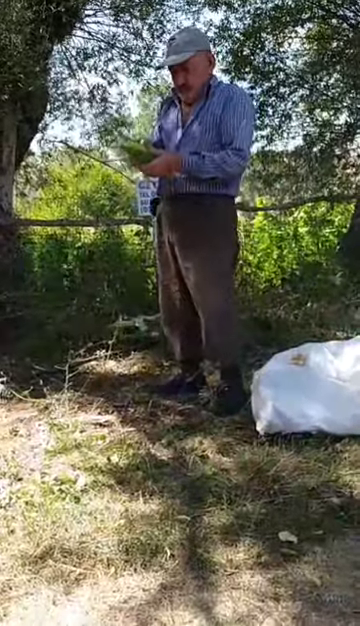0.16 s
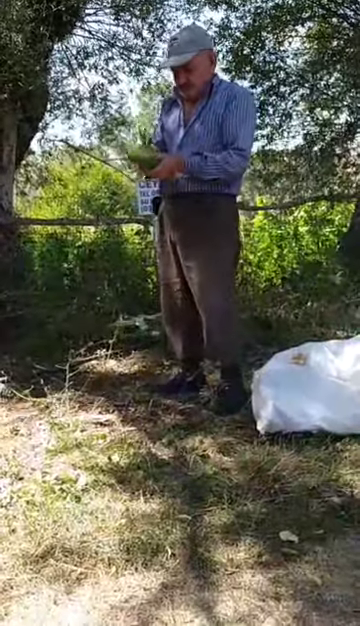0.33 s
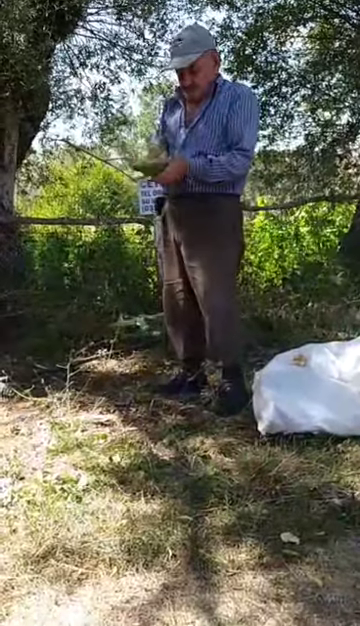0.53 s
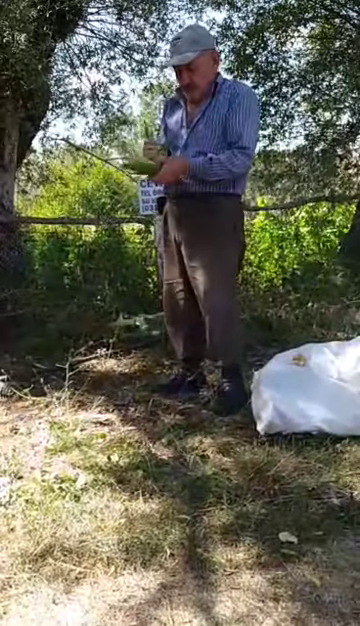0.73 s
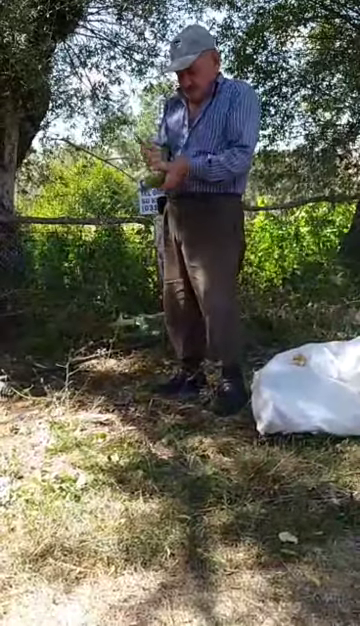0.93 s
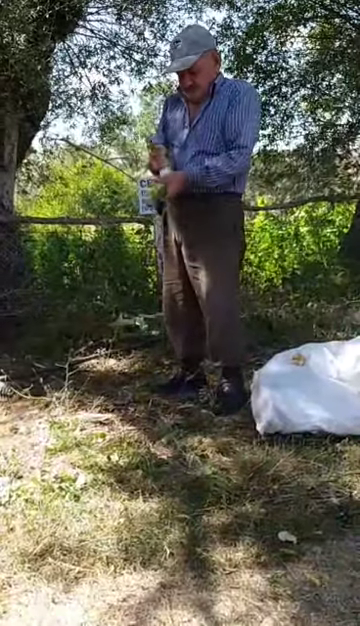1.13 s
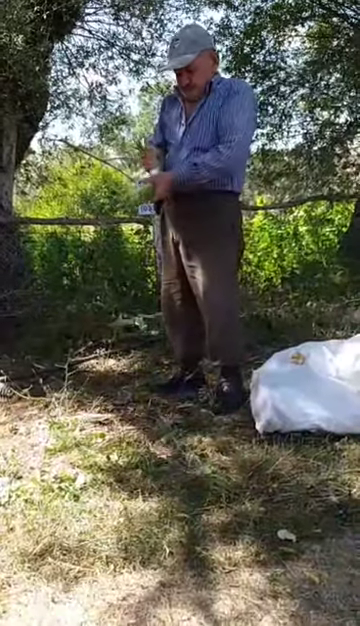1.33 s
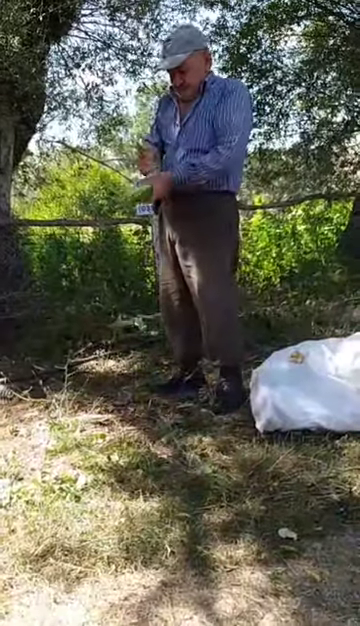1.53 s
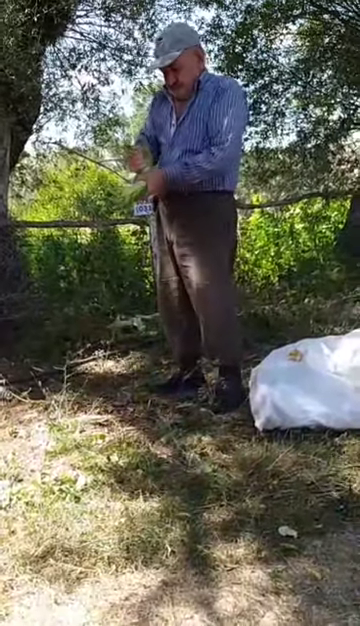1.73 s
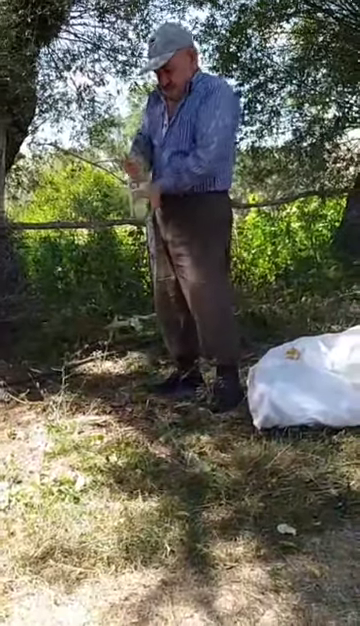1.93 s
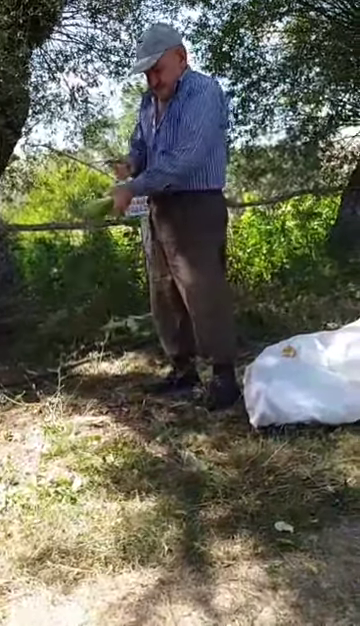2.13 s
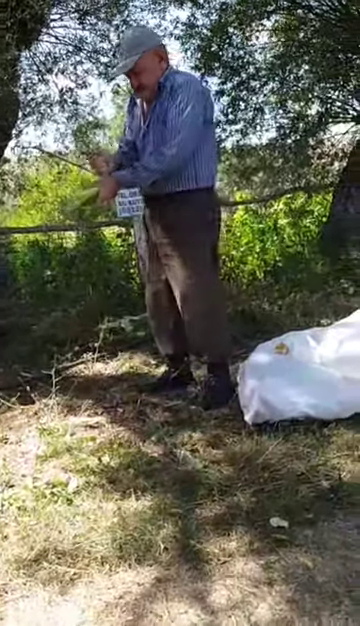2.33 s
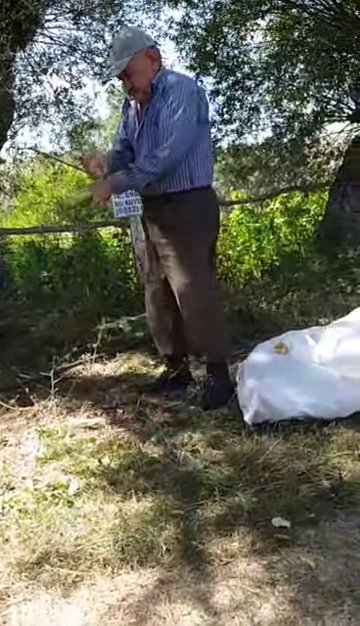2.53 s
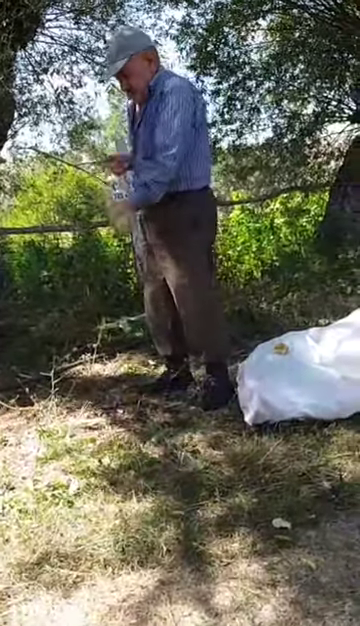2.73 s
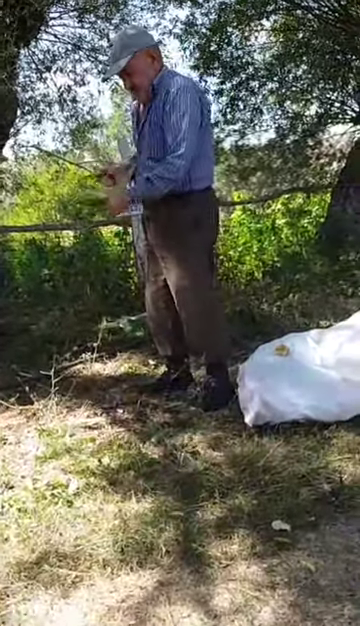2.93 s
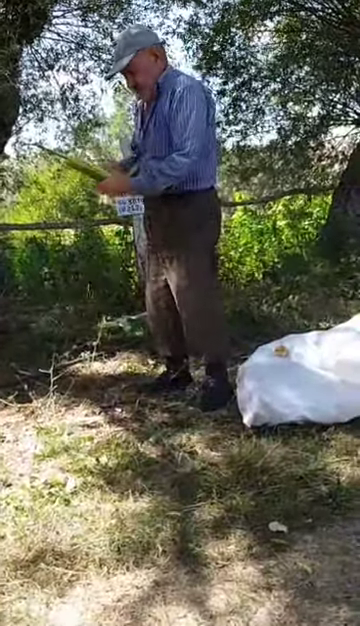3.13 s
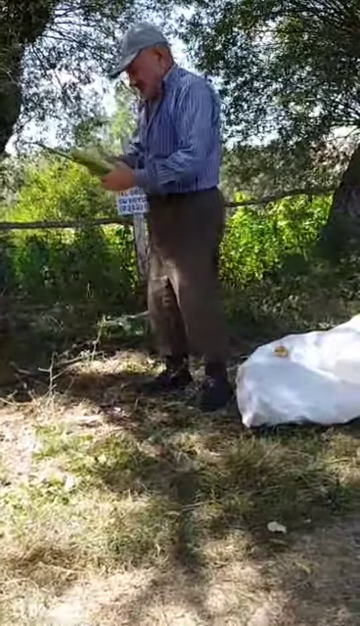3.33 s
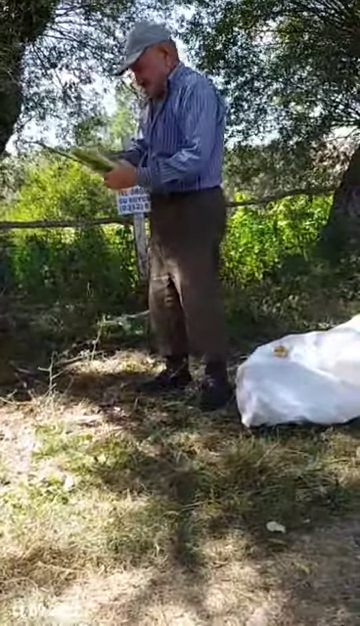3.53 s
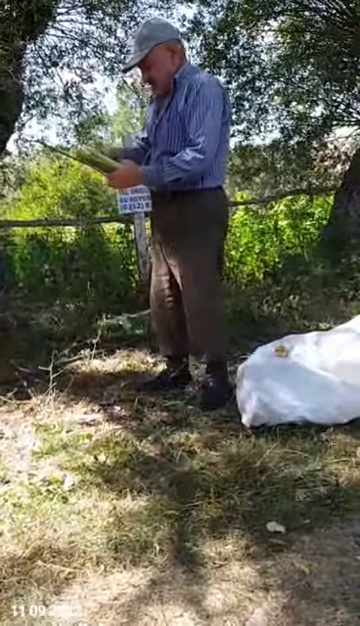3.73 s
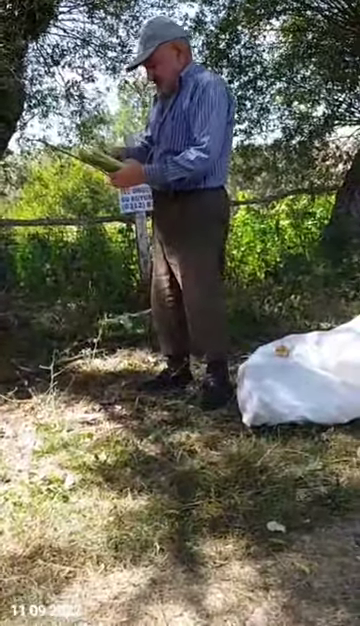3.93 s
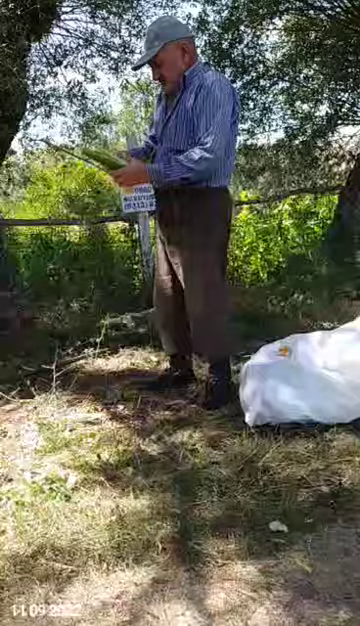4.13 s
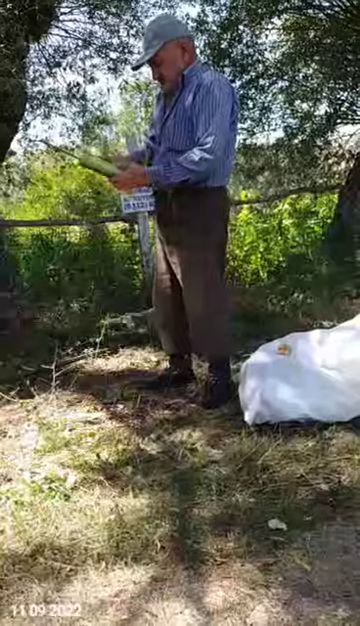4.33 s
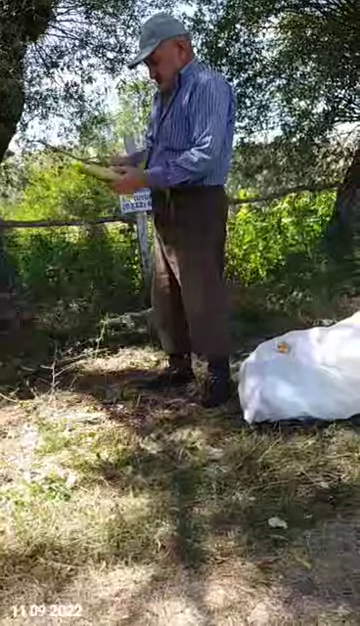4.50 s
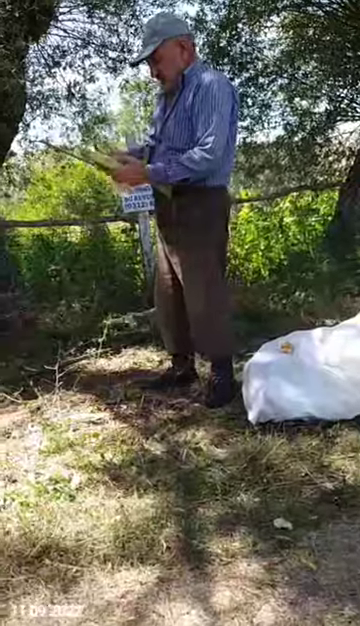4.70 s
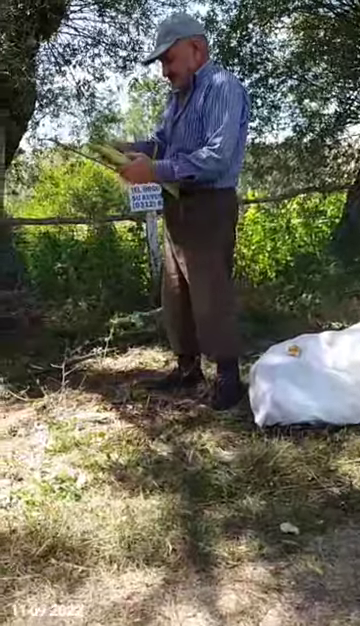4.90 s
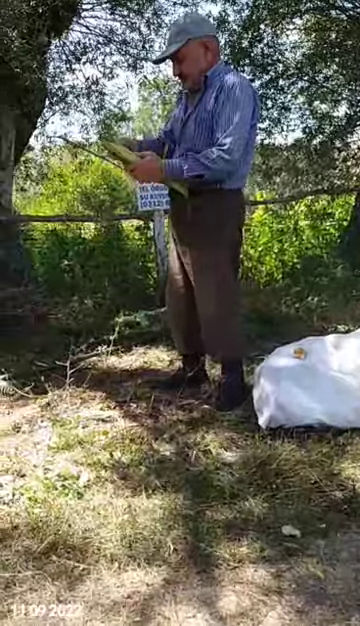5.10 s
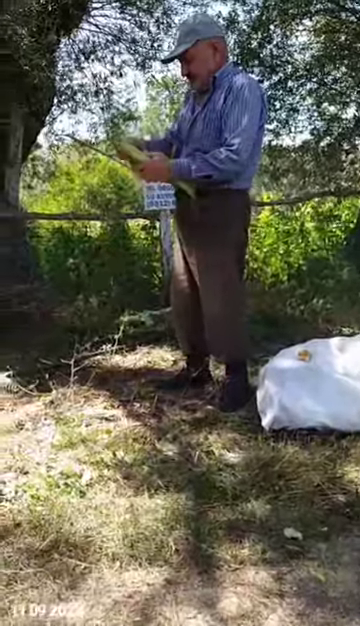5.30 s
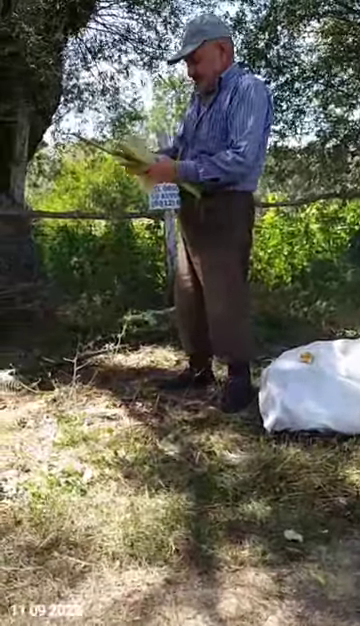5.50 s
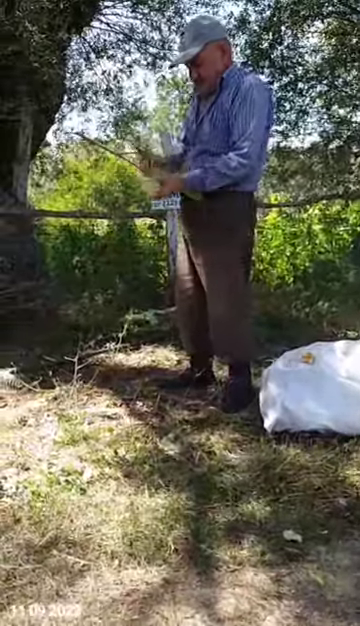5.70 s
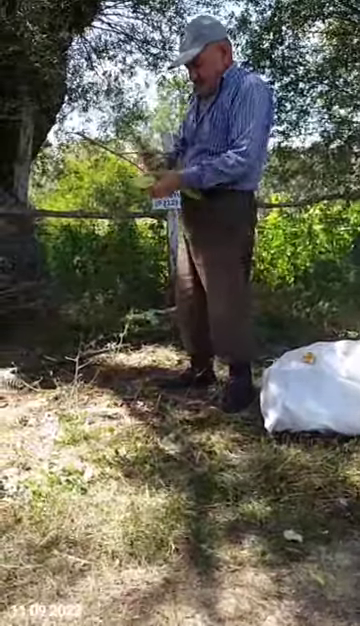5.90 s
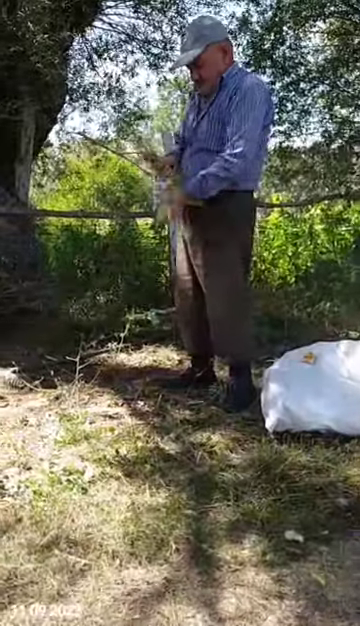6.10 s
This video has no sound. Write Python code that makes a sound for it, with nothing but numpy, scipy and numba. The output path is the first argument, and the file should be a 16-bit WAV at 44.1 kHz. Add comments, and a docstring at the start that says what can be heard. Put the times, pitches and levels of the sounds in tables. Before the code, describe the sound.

Fresh corn husk is torn by hand outdoors, with crackling rips, sharp snaps, a brief flapping rip and squeak over a faint breeze.

```python
"""Husking corn under trees

A fresh ear of corn is husked under trees, about three metres from a phone with two microphone ports.
Each pull parts fibres as random grains of noise; snapping ribs are clicks that ring the leaf's modes.
A moist leaf creaks and squeaks by uneven slips, and one husk is ripped right off and flaps.
Hands knock dully as damped, sagging tones; the trees return a faint tail.
Behind, filtered noise makes a murmuring breeze, a hiss of foliage and puffs at the ports."""
import sys
import numpy as np
from scipy import signal
from scipy.fft import rfft, irfft
from scipy.io import wavfile
from scipy.ndimage import uniform_filter1d
from numba import njit

SR = 44100
rng = np.random.default_rng(int(sys.argv[2]) if len(sys.argv) > 2 else 0)


def dump(signal):
    """Clip the signal to [-1, 1] and save it as 16-bit WAV at the path in sys.argv[1]."""
    limited = np.clip(np.atleast_2d(signal).T, -1, 1)
    pcm = np.round(limited * 32767).astype(np.int16)
    wavfile.write(sys.argv[1], SR, pcm)


N = 271215
TIME = np.arange(N) / SR

# All table levels are relative: mix gains and the microphone's colour come after them.
# strips of husk torn down the ear: [start t/s, length/s, fibre crackle level/dB, papery rub level/dB]
TEARS = [(0.488, 0.1, -50.5, -58), (0.585, 0.091, -56, -61), (1.095, 0.17, -47.5, -58.5),
         (2.044, 0.0044, -33.5, -38), (2.735, 0.044, -32.5, -36.5), (5.599, 0.021, -47, -48.5),
         (5.656, 0.056, -46.5, -57), (5.721, 0.026, -54, -49)]
# hands and loose leaves slide over the ear: [middle t/s, half length/s, crackle level/dB, rub level/dB]
SLIDES = [(0.163, 0.84, -63.5, -73), (0.345, 0.035, -54.5, -61.5), (0.592, 0.063, -55, -58),
          (0.83, 0.038, -57.5, -67.5), (0.942, 0.042, -57.5, -67), (1.074, 0.018, -60, -59),
          (1.194, 0.014, -44.5, -52), (1.24, 0.21, -54, -62.5), (1.556, 0.077, -51, -64.5),
          (1.812, 0.06, -59, -79), (2.046, 0.033, -45.5, -53), (2.349, 0.06, -58.5, -66),
          (2.723, 0.021, -56, -60), (2.844, 0.17, -77, -65.5), (3.046, 0.037, -55.5, -72),
          (4.22, 0.39, -63, -66.5), (4.466, 0.077, -50.5, -59.5), (4.987, 0.98, -67.5, -70),
          (5.65, 0.14, -49, -57), (5.692, 0.013, -39, -60), (5.917, 0.061, -59.5, -67),
          (6.045, 0.053, -55, -68.5), (6.128, 0.084, -61, -62.5)]
# leaf ribs that snap: [t/s, click level/dB, jolt to the leaf level/dB, dry treble crack level/dB]
SNAPS = [(0.2442, -48, -59, -70), (0.2727, -45, -64, -70), (0.4828, -41.5, -59, -70),
         (0.506, -43, -53, -68), (0.5346, -45, -60, -68), (0.5837, -40, -46, -68), (0.6503, -53, -46, -70),
         (0.6777, -47, -66, -70), (1.0954, -34, -48, -60), (1.1078, -37, -50, -66), (1.122, -37, -46, -60),
         (1.1452, -39, -51, -62), (1.1503, -34, -50, -62), (1.183, -35, -45, -60),
         (1.1928, -40, -35.5, -60), (1.2166, -39, -54, -64), (1.2418, -20.5, -52, -33),
         (1.6283, -45, -61, -70), (1.7925, -27, -62, -57), (1.8047, -46, -66, -70), (1.8098, -43, -56, -70),
         (2.0325, -34, -49, -62), (2.0404, -22, -31, -60), (2.0435, -25, -26.5, -60),
         (2.0496, -26, -36, -62), (2.0597, -32, -57, -64), (2.3684, -41, -59, -70), (2.7162, -45, -60, -70),
         (2.7354, -27, -44, -60), (2.7374, -24, -42, -58), (2.7418, -21.5, -43, -55),
         (2.7479, -35, -20, -58), (2.7654, -29, -33, -58), (2.769, -35, -26, -58), (2.781, -19.5, -51, -56),
         (2.787, -29, -46, -62), (4.4134, -36, -62, -70), (4.5919, -40, -68, -67), (5.4843, -43, -56, -70),
         (5.5042, -37, -50, -58), (5.5873, -30, -50, -53), (5.5896, -28, -52, -58), (5.6027, -36, -60, -60),
         (5.6146, -28.5, -48, -58), (5.6197, -29, -37, -60), (5.6698, -31, -54, -56),
         (5.688, -28, -52, -60), (5.7438, -35.5, -50, -62), (5.7658, -48, -62, -66),
         (5.7713, -33.5, -50, -46), (5.781, -43, -64, -62), (5.9762, -40, -66, -70)]
# whole husk flexes in the hand or flaps as it is ripped off: [start t/s, length/s, level/dB, release/s]
FLEXES = [(1.253, 0.066, -63.5, 0.13), (2.754, 0.036, -41, 0.035), (2.815, 0.019, -46, 0.06),
          (4.13, 0.11, -63.5, 0.23)]
# moist leaf sticks and slips on the one beneath, a slow creak then a squeak:
# two lists of [t/s, slip rate f/Hz, level/dB, ring of the leaf f/Hz]
SQUEAKS = [
    [(1.09, 160, -68, 2110), (1.097, 160, -53.5, 2100), (1.13, 123, -54, 1990), (1.17, 150, -57, 2250),
     (1.208, 207, -59, 1480), (1.25, 200, -72, 1500)],
    [(5.63, 390, -81, 1480), (5.658, 400, -42.5, 1390), (5.675, 350, -47.5, 1220),
     (5.692, 420, -43.5, 1590), (5.707, 440, -46.5, 1500), (5.724, 690, -52.5, 1400),
     (5.775, 650, -73, 1420)],
]
# dull knocks of handling: [t/s, level/dB, first pitch f/Hz, last pitch f/Hz, t60/s, contact tick level/dB]
KNOCKS = [(0.676, -46, 387, 365, 0.1, -60), (2.238, -35.5, 424, 398, 0.033, -55),
          (3.946, -39, 269, 132, 0.09, -47)]
# bending modes of a husk leaf: [f/Hz, width/Hz, level/dB]
LEAF_MODES = [(764, 58, 0), (1540, 174, 1), (2050, 180, 3), (2580, 300, 7.5)]
# hollow between husk and hand: [f/Hz, width/Hz, level/dB]
HOLLOW_MODES = [(166, 48, 6), (260, 80, 7), (340, 19, 8.5), (385.5, 19, 9.5), (791, 46, 1.5),
                (1547, 37, -0.5), (1724, 50, -7), (2000, 27, -10), (1950, 560, -26)]
# modes of the knocked ear: [f/Hz, width/Hz, level/dB]
EAR_MODES = [(452, 35, 3), (735, 230, -4.5), (1090, 210, -4), (1390, 44, -6), (1700, 91, -7)]
# spectral outline of parting fibres: [f/Hz, level/dB]
FIBRE_COLOUR = [(600, -40), (2000, 0), (3000, -22.5), (4700, -1), (6500, 6.5), (9000, 9), (11000, 7),
                (12500, -1), (15500, -6.5)]
# spectral outline of leaf faces rubbing: [f/Hz, level/dB]
PAPER_COLOUR = [(200, -13), (500, -14), (800, 5), (1100, -2), (1600, 1), (2400, 3.5), (3500, 1), (6000, -2),
                (12000, -58)]
# spectral outline of a snapping rib: [f/Hz, level/dB]
RIB_COLOUR = [(400, -13), (1500, 2), (3000, 10), (4500, 13), (6500, 5.5), (8500, 8.5), (11000, 8),
              (13000, -30), (15500, -28)]
# spectral outline of the dry treble crack: [f/Hz, level/dB]
CRACK_COLOUR = [(1200, -18), (2800, 9), (5000, 11), (8500, -8), (13300, 11), (15500, 8)]
# low murmur of the breeze, before and after the big rip: [t/s, level/dB, centre f/Hz]
MURMUR_EARLY = [
    (0.0, -57, 206), (0.07, -63.5, 192), (1.1, -74.5, 225), (1.45, -53.5, 213), (1.72, -61, 187),
    (2.04, -58.5, 176), (2.51, -67, 247), (2.54, -62, 245), (2.68, -57.5, 232)]
MURMUR_LATE = [
    (3.0, -60, 221), (3.35, -64, 230), (3.39, -56, 210), (3.67, -65.5, 218), (4.58, -63, 216),
    (4.89, -77, 222), (5.46, -58, 205), (5.93, -65, 268), (6.15, -64, 197)]
# puffs of air on the ports: [middle t/s, half length/s, level/dB]
PUFFS = [(0.25, 0.034, -58), (0.413, 0.062, -51.5), (0.55, 0.06, -59), (0.854, 0.11, -53),
         (1.343, 0.057, -59)]
# spectral outline of the stirred foliage: [f/Hz, level/dB]
FOLIAGE_COLOUR = [(100, 13.5), (380, 6.5), (550, 6.5), (1000, 4), (2000, -1.5), (4000, -0.5), (7000, -2.5),
                  (9500, -1.5), (11000, -10.5), (12500, -9.5), (15500, -16.5)]
# spectral outline of air buffeting a port: [f/Hz, level/dB]
BUFFET_COLOUR = [(15, 0), (35, -5), (60, -5), (100, -20), (200, -19), (600, -46)]
# resonances of the left, then the right microphone port: [f/Hz, width/Hz, added resonance level/dB]
PORTS = [
    [(327, 120, -6), (9250, 890, -10), (10770, 1630, 3)],
    [(9150, 2220, 6.5)],
]

LEFT_LAG = 6  # samples by which the left port hears the hands later than the right
TOP_HZ = 15700  # upper limit of the microphone
# a tear starts and stops fast, more gently by a share of its length; freed fibres go on settling
TEAR_ATTACK_S, TEAR_RELEASE_S, TEAR_EASE = 0.0042, 0.0014, 0.0085
SETTLE_S, SETTLE_DB = 0.023, -10
# a tear advances in jerks: mean rate, spread of the log rate, decay as a share of a cycle
JERKS_PER_S, JERK_SPREAD, JERK_SHARE = 150, .25, .25
# a bending leaf's pitch wanders: spread as a share of the pitch, new bends per second
BEND_SHARE, BENDS_PER_S = .035, 22
# a snapped rib rings: middle pitch, decay, spread as a share of the pitch
RIB_HZ, RIB_RING_S, RIB_SPREAD = 8900, .00024, .04
# the chest behind the hands returns each snap
CHEST_ECHO_S, CHEST_ECHO_DB = 0.001312, -7
FLEX_ATTACK_S = 0.0081
# shift of the tabled murmur, and a steady murmur under it
MURMUR_SHIFT_DB, MURMUR_STEADY_DB = -1, -67.5
# the draught between the puffs dies down to a calm
DRAUGHT_DB, CALM_DB, DRAUGHT_ENDS_S = -57, -64.5, 2.3


def tearing():
    """Fibres part in a bright crackle while leaf faces rub in jerks and set the leaf ringing."""
    crackle_db, rub_db = handwork()
    # a gentle slide is a fine, even fizz; a hard pull breaks fewer, coarser fibres and jerks more
    effort = np.clip((crackle_db + 56) / 12, 0, 1)
    breaks_per_s = 3400 - 1000 * effort
    spread_db = 3.4 + .5 * effort
    fibres = grains(breaks_per_s, spread_db)
    slipping = jerks(depth=.55 + .35 * effort)
    flutter_db = 1.7 * walk(45)

    crackle_energy = fibres * (1 + slipping) / 2 * undb(crackle_db + flutter_db / 2) ** 2
    crackle = bursts(crackle_energy, FIBRE_COLOUR, ring_s=.0002, scatter_db=-3)

    # the rub catches on every parting fibre and on the leaf's own ridges
    ridges = grains(breaks_per_s / 2, spread_db)
    catches = slipping * (fibres + ridges) / 2 * undb(rub_db + flutter_db) ** 2
    rub = bursts(catches, PAPER_COLOUR, ring_s=.0003, scatter_db=-6)
    ring = ahead(leaf(noise() * np.sqrt(catches)))
    return undb(-7) * crackle + undb(-3) * rub + undb(3) * ring


def handwork():
    """Levels in dB of crackle and rub, from the summed energy of all tears and slides."""
    energy = np.zeros((2, N))
    for start, length, *db in TEARS:
        ease = TEAR_EASE * length
        tear = held(start, length, TEAR_ATTACK_S + ease, TEAR_RELEASE_S + ease)
        settling = undb(SETTLE_DB) ** 2 * fade(tear, SETTLE_S)
        energy += np.outer(undb(db) ** 2, tear + settling)
    for middle, half_length, *db in SLIDES:
        energy += np.outer(undb(db) ** 2, swell(middle, half_length))
    return 10 * np.log10(energy)


def jerks(depth):
    """Energy of a grip that sticks and slips, some slips stronger than others; mean near 1."""
    rate = JERKS_PER_S * np.exp(JERK_SPREAD * walk(JERKS_PER_S))
    cycles = np.cumsum(rate) / SR
    strength = rng.uniform(.3, 1.7, N)[cycles.astype(int)]
    pulse = np.exp(-(cycles % 1) / JERK_SHARE) * strength
    return 1 - depth + depth * pulse / pulse.mean()


def leaf(x):
    """Ring the modes of a leaf, which wander in pitch together as it bends."""
    bend = np.exp(BEND_SHARE * walk(BENDS_PER_S))
    return sum(undb(db) * bandpass(x, hz * bend, float(width)) for hz, width, db in LEAF_MODES)


def snaps():
    """A stiff rib gives way in a sharp click, rings at its own pitch, jolts the leaf and cracks on top."""
    breaks, rings, jolts, cracks = np.zeros((4, N))
    age = TIME[:SR // 200]
    for (s, db, jolt_db, crack_db), chance in zip(SNAPS, rng.standard_normal(len(SNAPS))):
        i = int(s * SR)
        hz = RIB_HZ * np.exp(RIB_SPREAD * chance)
        ring = age * np.exp(-age / RIB_RING_S) * np.sin(2 * np.pi * hz * age)
        rings[i:i + len(age)] += undb(db) * ring / np.linalg.norm(ring)
        breaks[i], jolts[i], cracks[i] = undb(db), undb(jolt_db), undb(crack_db)

    direct = colour(breaks, RIB_COLOUR) + undb(-0.5) * rings + undb(18) * leaf(jolts)
    chest_echo = undb(CHEST_ECHO_DB) * np.roll(direct, int(CHEST_ECHO_S * SR))
    splinters = bursts(breaks ** 2, RIB_COLOUR, ring_s=.0009, scatter_db=-9)
    crack = bursts(cracks ** 2, CRACK_COLOUR, ring_s=.0005, scatter_db=-9)
    return ahead(direct + chest_echo) + undb(-1.5) * splinters + undb(15) * crack


def flap():
    """The loose husk buckles in uneven jerks that drum the hollow between leaf and hand."""
    energy = sum(undb(db) ** 2 * held(start, length, FLEX_ATTACK_S, release)
                 for start, length, db, release in FLEXES)
    buckles = grains(rate=700, spread_db=3) * jerks(depth=.8)
    buckling = noise() * np.sqrt(fade(buckles, .0006))
    band = signal.butter(4, [112, 2600], "bandpass", fs=SR, output="sos")
    body = signal.sosfilt(band, resonate(buckling, HOLLOW_MODES))
    return ahead(even(body) * np.sqrt(energy))


def squeak(table):
    """Uneven stick-slip pulses ring two bending modes of the leaf, which glide together in pitch."""
    rate, level_db, ring_hz = curves(table)
    cycles = np.floor(np.cumsum(rate * np.exp(0.1 * walk(300))) / SR)
    slips = np.diff(cycles, prepend=0) * undb(3.9 * walk(400))
    width_hz = 270.0
    lower = bandpass(bandpass(slips, ring_hz, width_hz), ring_hz, width_hz)
    # the upper mode is broadened by two slightly detuned passes
    upper = bandpass(bandpass(slips, 1.63 * ring_hz, 2 * width_hz), 1.73 * ring_hz, 2 * width_hz)
    touching = (TIME > table[0][0]) & (TIME < table[-1][0])
    damped = signal.sosfilt(signal.butter(4, 2900, fs=SR, output="sos"), lower + undb(-4) * upper)
    return ahead(even(damped) * undb(level_db) * touching)


def knocks():
    """Soft blows: a papery tick rings the ear's modes over a damped tone that sags as the grip gives."""
    thuds, contact = np.zeros(N), np.zeros(N)
    sag_s, attack_s = 0.014, .0016
    for s, db, first_hz, last_hz, t60, tick_db in KNOCKS:
        age = np.maximum(TIME - s, 0)
        cycles = last_hz * age + (first_hz - last_hz) * sag_s * (1 - np.exp(-age / sag_s))
        envelope = (1 - np.exp(-age / attack_s)) * np.exp(-np.log(1000) * age / t60)
        thuds += undb(db - 2.5) * np.sin(2 * np.pi * cycles) * envelope
        contact[int(s * SR)] += undb(tick_db) ** 2
    ticks = bursts(contact, PAPER_COLOUR, ring_s=.003, scatter_db=-14)
    dull_ticks = signal.sosfilt(signal.butter(2, 2000, fs=SR, output="sos"), ticks)
    ring = resonate(np.sqrt(contact), EAR_MODES)
    return ahead(thuds + undb(30.5) * ring) + undb(15) * dull_ticks


def bursts(energy, points, ring_s, scatter_db):
    """Each break is a brief burst of noise, followed by its scatter from hands, body and ground."""
    direct = colour(noise() * np.sqrt(fade(energy, ring_s)), points)
    return ahead(direct) + undb(scatter_db) * scatter(energy, points)


def scatter(energy, points):
    """The diffuse few milliseconds after each break, different at the two ports."""
    return np.array([colour(noise() * np.sqrt(fade(energy, .003)), points) for _ in range(2)])


def ahead(x):
    """A direct sound reaches the right port a little before the left."""
    return np.array([np.roll(x, LEFT_LAG), x])


def trees(x, t60, wet_db, top_hz):
    """Trunks and branches return a faint, duller tail of decaying noise."""
    age = TIME[:SR // 2]
    envelope = np.exp(-np.log(1000) * age / t60) * (1 - np.exp(-age / 0.0016))
    tail = rng.standard_normal((2, len(age))) * envelope
    tail /= np.linalg.norm(tail, axis=1, keepdims=True)
    tail = signal.lfilter(*signal.butter(1, top_hz, fs=SR), tail)
    return undb(wet_db) * signal.fftconvolve(x, tail, axes=1)[:, :N]


def breeze():
    """A wandering low murmur, a smooth hiss of foliage, and turbulent air partly shared by the ports."""
    level_db, centre_hz = curves([*MURMUR_EARLY, *MURMUR_LATE])
    width_hz = 102.0
    strength = np.hypot(undb(level_db + MURMUR_SHIFT_DB), undb(MURMUR_STEADY_DB))
    band = bandpass(bandpass(noise(), centre_hz, width_hz), centre_hz, width_hz)
    murmur = unit(band) * strength * undb(0.24 * walk(25))

    rustle = np.array([colour(noise(), FOLIAGE_COLOUR) for _ in range(2)])
    hiss = rustle * undb(-64 + .5 * walk(3.22))

    draught = undb(np.interp(TIME, [0, DRAUGHT_ENDS_S], [DRAUGHT_DB, CALM_DB]))
    puffs = sum(undb(db) ** 2 * swell(middle, half_length) for middle, half_length, db in PUFFS)
    air = np.sqrt(draught ** 2 + puffs)
    shared = noise()
    eddies = np.array([unit(colour(noise() + 0.94 * shared, BUFFET_COLOUR)) for _ in range(2)])
    lumps_db = 2 * walk(16)
    return ahead(murmur) + hiss + eddies * air * undb(lumps_db)


def undb(db):
    """Decibels to gain."""
    return 10 ** (np.asarray(db) / 20)


def unit(x):
    """Scale to rms 1."""
    return x / np.sqrt(np.mean(x ** 2))


def even(x):
    """Hold the rms at 1 over about 20 ms, keeping the quick pulses."""
    return x / np.sqrt(uniform_filter1d(x ** 2, size=900) + 1e-9 * np.mean(x ** 2))


def noise():
    """White noise."""
    return rng.standard_normal(N)


def walk(rate):
    """Random levels held for 1 / rate s and smoothed twice; spread near 1."""
    k = int(SR / rate)
    steps = np.repeat(noise()[:N // k + 1], k)
    return 1.3 * uniform_filter1d(uniform_filter1d(steps, k), k)[:N]


def grains(rate, spread_db):
    """Energy of tiny breaks at random moments and of random size; the local mean is 1."""
    struck = rng.random(N) < rate / SR
    size_db = spread_db * np.clip(noise(), -2, 2)
    energy = struck * undb(size_db) ** 2 + 1e-6
    return energy / uniform_filter1d(energy, size=900)


def fade(energy, seconds):
    """Let energy die away exponentially, keeping its sum."""
    keep = np.exp(-1 / (seconds * SR))
    return signal.lfilter([1 - keep], [1, -keep], energy)


def swell(middle, half_length):
    """Energy of a smooth movement that comes and goes, top 1."""
    return np.exp(-2 * ((TIME - middle) / half_length) ** 2)


def held(start, length, attack, release):
    """Energy that rises exponentially, holds at 1 and dies away."""
    before = np.maximum(start - TIME, 0) / attack
    after = np.maximum(TIME - start - length, 0) / release
    return np.exp(-2 * np.minimum(before + after, 20))


def curves(table):
    """The columns of a timed table, one value a sample."""
    s, *columns = np.transpose(table)
    return [np.interp(TIME, s, c) for c in columns]


def colour(x, points):
    """Minimum-phase filter with the given (f/Hz, level/dB) outline and unit power gain."""
    hz, db = np.transpose(points)
    grid = np.linspace(1, SR / 2, 513)
    outline = undb(np.interp(np.log(grid), np.log(hz), db))
    cepstrum = irfft(np.log(outline))
    half = len(cepstrum) // 2
    # folding the cepstrum onto positive times makes the response causal
    folded = np.r_[cepstrum[0], 2 * cepstrum[1:half], np.zeros(half)]
    response = irfft(np.exp(rfft(folded)))
    return signal.fftconvolve(x, response / np.linalg.norm(response))[:N]


@njit
def bandpass(x, hz, width):
    """State-variable band-pass whose centre may move, gain 1 at the centre."""
    y, band, low = np.empty(len(x)), 0., 0.
    for i in range(len(x)):
        g = np.tan(np.pi * hz[i] / SR)
        k = width / hz[i]
        v = (band + g * (x[i] - low)) / (1 + g * (g + k))
        band = 2 * v - band
        low = low + 2 * g * v
        y[i] = k * v
    return y


def resonate(x, modes):
    """Sum of (f/Hz, width/Hz, level/dB) resonances."""
    return sum(undb(db) * bandpass(x, np.full(N, float(hz)), float(width)) for hz, width, db in modes)


def scene():
    """The husking, its echo among the trees, and the breeze."""
    squeaks = sum(squeak(table) for table in SQUEAKS)
    husk = tearing() + snaps() + flap() + squeaks + knocks()
    return husk + trees(husk, t60=0.076, wet_db=-5, top_hz=4070) + breeze()


def record(dry):
    """Each port rings in its own way; the phone cuts the top."""
    coloured = np.array([x + resonate(x, port) for x, port in zip(dry, PORTS)])
    return signal.sosfilt(signal.ellip(10, .2, 80, TOP_HZ, fs=SR, output="sos"), coloured)


dry = scene()
out = record(dry)
dump(out)
```